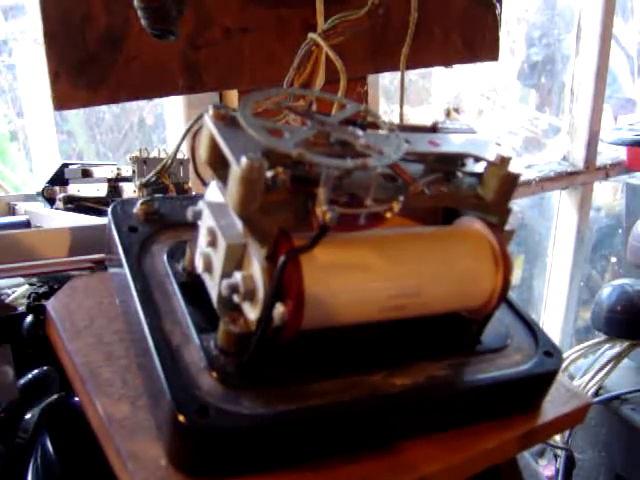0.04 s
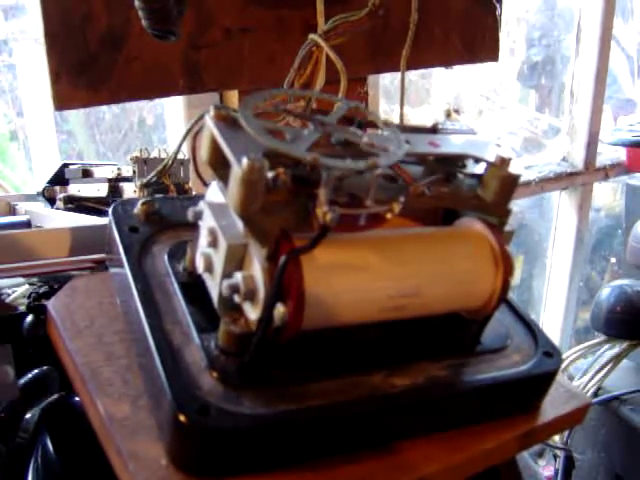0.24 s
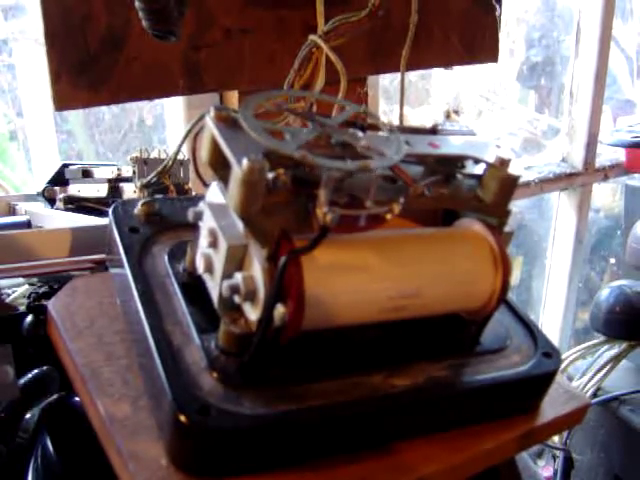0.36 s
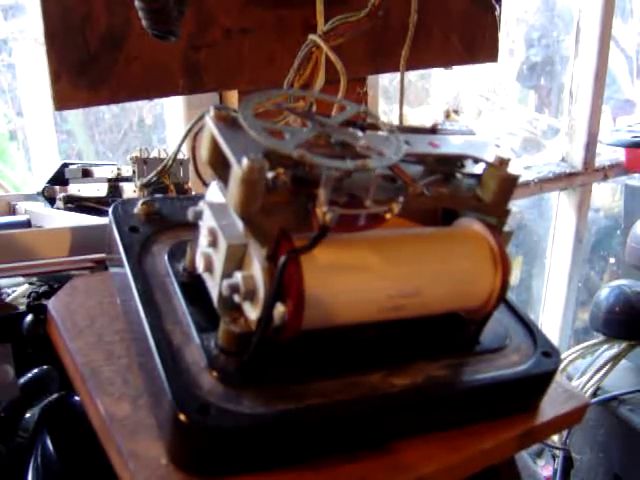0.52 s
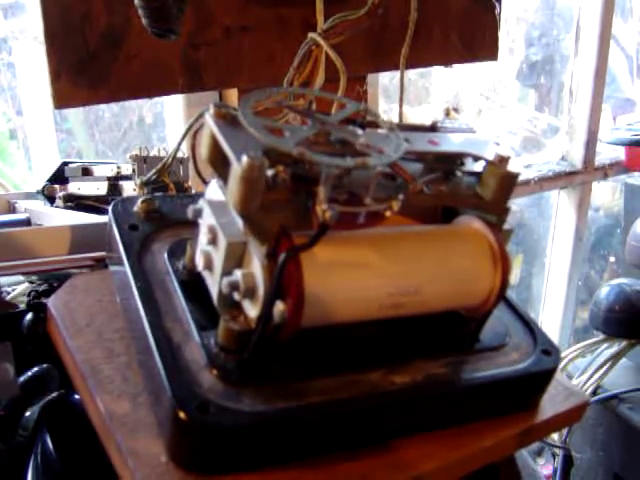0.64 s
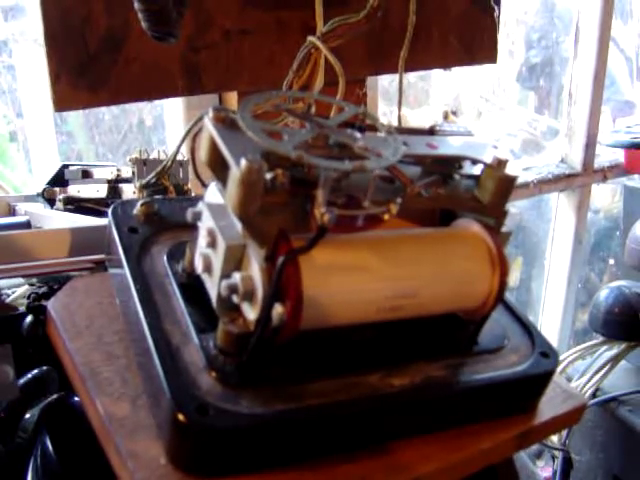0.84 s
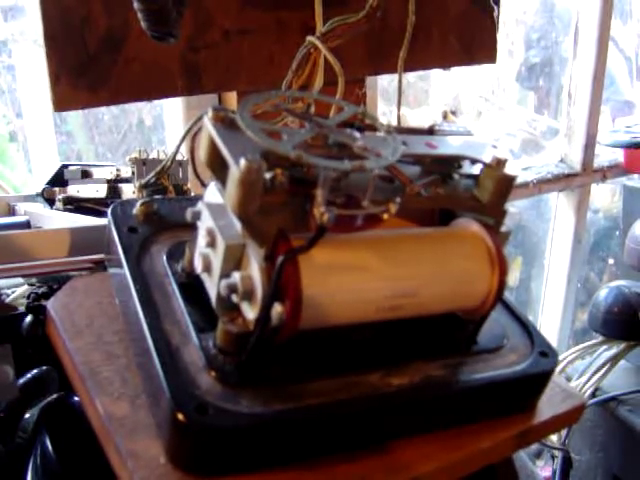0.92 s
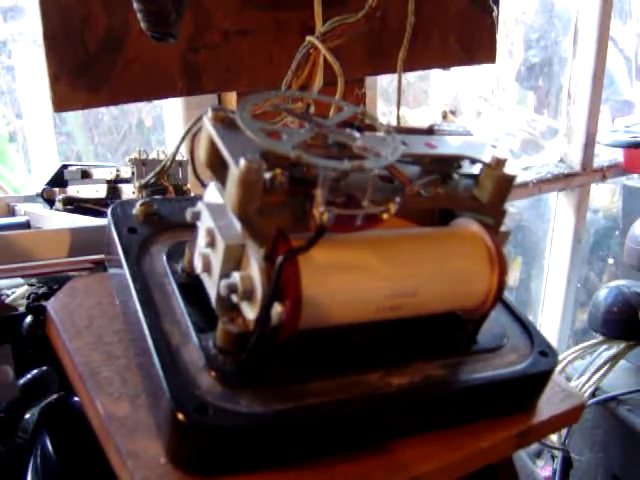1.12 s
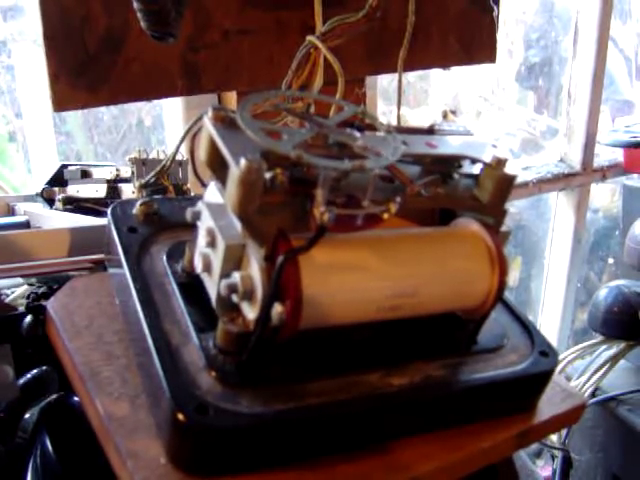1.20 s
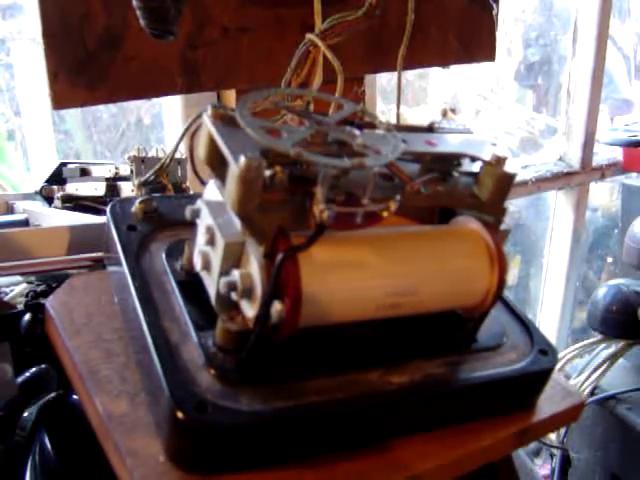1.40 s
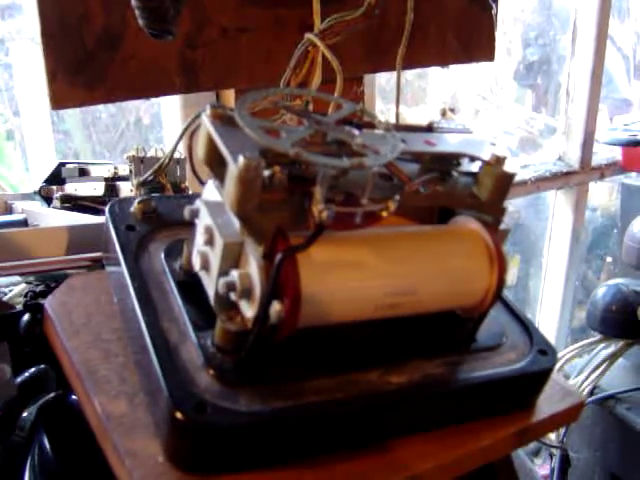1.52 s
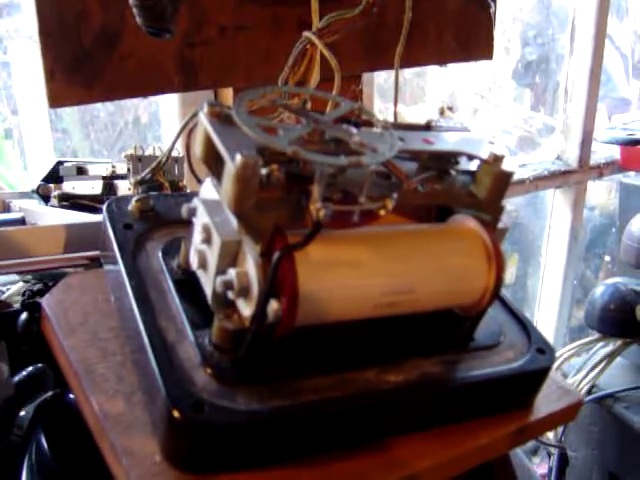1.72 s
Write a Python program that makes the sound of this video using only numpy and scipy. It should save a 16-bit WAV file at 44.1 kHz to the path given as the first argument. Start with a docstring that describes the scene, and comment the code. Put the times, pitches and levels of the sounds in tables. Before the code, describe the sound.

An old electromechanical mechanism gives two quick groups of sharp metal clacks with ticking contacts and rattling springs. A few faint hollow knocks follow as it settles, close to the microphone in a small quiet room.

```python
"""A small quiet room, microphone close to an old electromagnetic telephone selector on a wooden table.
The armature pulls in and drops back: two groups of metal clacks ring the frame and its small parts,
one clack with a low thump, while contacts tick and loose springs rattle. As the mechanism settles,
soft knocks sound its hollow base and something brushes lightly. Room tone and hiss lie underneath."""
import sys
import numpy as np
from scipy import signal
from scipy.fft import rfft, irfft
from scipy.io import wavfile

SR = 44100
rng = np.random.default_rng(int(sys.argv[2]) if len(sys.argv) > 2 else 0)


def store_wav(level_fs):
    """Save 16-bit WAV to argv[1]."""
    pcm = np.round(np.clip(np.atleast_2d(level_fs), -1, 1) * 32767)
    wavfile.write(sys.argv[1], SR, pcm.T.astype(np.int16))


N = 77175

# steady room tone and hiss (frequency [Hz], level [dB])
FLOOR_SPECTRUM = [(18, -53), (30, -18), (96, -8), (181, -4.5), (210, 0), (274, -1.5), (491, -5.5),
                  (541, -3), (626, -5), (1780, -10.5), (2060, -13), (2500, -12.5), (10000, -15),
                  (13000, -98), (22000, -120)]
# faint wash behind the opening (frequency [Hz], level [dB])
WASH_SPECTRUM = [(60, -15), (200, -0.5), (450, 3), (800, -4), (1500, -4.5), (3100, -5.5), (4500, -15.5),
                 (10000, -32)]
# colour of the room's tail (frequency [Hz], level [dB])
TAIL_SPECTRUM = [(100, 7), (250, 5.5), (450, 4), (800, 6.5), (1100, -3.5), (1600, -1.5), (2200, -8.5),
                 (3500, -9.5), (6000, -9.5), (10000, -8.5)]
# decay of the room's tail (frequency [Hz], t60 [s])
TAIL_DECAY = [(150, .6), (500, 0.61), (1200, .34), (3000, 0.29), (6000, 0.23), (10000, 0.13)]
# light brushing (frequency [Hz], level [dB])
BRUSH_SPECTRUM = [(300, -26), (1500, -7), (3000, -1), (4500, -1), (6000, -4), (10000, -27)]
# soft knocks (time [s], level [dB], rise [s], tilt [dB/octave], most excited frequency [Hz], its lift [dB])
SETTLING_KNOCKS = [(0.5440, -39, 0.0075, -0.5, 925, 1), (0.6030, -46.5, 0.0093, 1.5, 1590, 16),
                   (0.7630, -43, 0.0086, -2, 2790, 2), (0.9010, -47, 0.011, 0, 910, -1.5),
                   (0.9820, -48.5, 0.015, -1.5, 1320, 9)]
# modes of the hollow base (frequency [Hz], level [dB], t60 [s])
BASE_MODES = [(445, -3.5, 0.19), (497.7, -5.5, 0.15), (792, -3.5, 0.12), (868.4, -2, 0.19),
              (944, -0.5, 0.036), (1460, -11, 0.18), (2080, -13.5, .18), (2750, -12.5, 0.18)]
# noisy part of a knock (frequency [Hz], level [dB])
KNOCK_SPECTRUM = [(150, -17), (460, -5.5), (620, -3), (850, -0.5), (1200, -5.5), (1600, -11), (3000, -11.5),
                  (4500, -20), (10000, -34)]
# light ticks of pawl and contacts (time [s], level [dB])
CONTACT_TICKS = [(0.2405, -34.5), (0.2662, -25), (0.384, -20), (0.3898, -27), (0.4035, -35), (0.4087, -36),
                 (0.4408, -39), (0.451, -38.5), (0.4586, -48), (0.485, -55), (1.01, -48)]
# loose springs rattling on after the blows (time [s], level [dB], t60 [s], tilt [dB/octave])
SPRING_RATTLES = [(0.267, -32, 0.2, -2.5), (0.381, -29, 0.087, 0), (0.475, -42.5, 0.24, -2.5)]
# dense ring of the small parts (frequency [Hz], level [dB])
PARTS_SPECTRUM = [(100, -34), (300, -12.5), (520, -8.5), (900, -6), (1100, -4), (1300, -6), (1700, -1.5),
                  (2200, 1), (3500, 1), (5200, -1), (7000, -4.5), (8300, 1.5), (10000, -5.5)]
# modes of frame and armature (frequency [Hz], level [dB], t60 [s])
FRAME_MODES = [(542, -18, 0.13), (775.8, -14, 0.26), (1017.6, 3, 0.11), (1094.6, -1, 0.11), (1142, 0, 0.13),
               (1338.5, -9.5, 0.16), (1695, -6.5, 0.07), (1981, -8, 0.069), (2054, -4, 0.052),
               (2164, -2.5, 0.072), (2607, 1.5, 0.046), (2690, -7.5, 0.074), (2930, -7, 0.033),
               (3325, -5.5, 0.076), (3390, -2.5, 0.053), (3490, -4, 0.064), (3821, 3.5, 0.042),
               (4261, -4, 0.072), (4276, -4, 0.027), (4760, -9, 0.06), (5878, 3, 0.028), (7780, -11, 0.032),
               (8500, -12, 0.067), (8620, -10, 0.08), (9270, -5.5, 0.045)]
# metal blows (time [s], level [dB], rise [s], small parts' t60 at 2500 Hz [s], bass [dB], body [dB],
# clang [dB], treble [dB], most excited frequency [Hz], its lift [dB])
ARMATURE_BLOWS = [(0.2256, -15.5, 0.0082, 0.042, 0.5, -3.5, 0.5, -2, 2510, 7.5),
                  (0.2560, -18, 0.0045, 0.042, 0, -1, -1.5, -5, 2014, 7.5),
                  (0.371, -16, 0.0029, 0.063, -6, -0.5, -3.5, 2.5, 3690, 4),
                  (0.4230, -18.5, 0.0026, 0.051, -3.5, 1, 3.5, -5, 2180, 7.5),
                  (0.4690, -26.5, 0.0023, 0.082, 0.5, -6.5, -4.5, -9.5, 2190, 9.5)]

CONTACT_S = 0.0022  # struck parts grind together this long before they ring freely
EXCITED_WIDTH_HZ, TOP_HZ = 148, 10100
TIME, BIN_HZ = np.arange(N) / SR, np.fft.rfftfreq(N, 1 / SR)


def undb(db):
    """Decibels to gain."""
    return 10 ** (np.asarray(db) / 20)


def unit(x):
    """Scale to rms 1."""
    return x / np.sqrt(np.mean(x ** 2))


def octaves(hz):
    """Distance of each spectral bin from a frequency, in octaves."""
    return np.log2(np.maximum(BIN_HZ, 10) / hz)


def curve(points):
    """A (Hz, dB) table spread over the spectral bins, 2 % lower in pitch."""
    hz, db = np.array(points, float).T
    return np.interp(octaves(0.98), np.log2(hz), db)


def bump(hz, width):
    """A resonance shape over the spectral bins, 1 at its centre."""
    return 1 / (1 + (2 * (BIN_HZ - hz) / width) ** 2)


def colour(x, db):
    """Filter by a dB value per bin."""
    return irfft(rfft(x) * undb(db), N)


def noise(db):
    """Noise of rms 1 with the given spectrum."""
    return unit(colour(rng.standard_normal(N), db))


def onset(start, rise):
    """A smooth step from 0 to 1."""
    return np.sin(np.pi / 2 * np.clip((TIME - start) / rise, 0, 1)) ** 2


def strike(start, rise, t60, hold=0):
    """Envelope of a blow: a short rise, a hold, then exponential decay."""
    return onset(start, rise) * undb(-60 * np.maximum(TIME - start - rise - hold, 0) / t60)


def fade(x, start, rise, t60_at, hold=0):
    """Let each octave of a sound die away at its own rate."""
    out, spectrum = 0, rfft(x)
    octave = np.clip(octaves(160), 0, 6)
    for k in range(7):
        band = irfft(spectrum * np.maximum(1 - abs(octave - k), 0), N)
        out += band * strike(start, rise, t60_at(160 * 2 ** k), hold)
    return out


def ring(modes, start, rise, tone_db, detune=0.0019):
    """Decaying modes of a struck body, weighted by the tone of this blow."""
    out = 0
    for hz, db, t60 in modes:
        weight = undb(db + tone_db[int(hz * N / SR)])
        cycles = hz * (1 + detune * rng.standard_normal()) * (TIME - start) + rng.random()
        out += weight * np.sin(2 * np.pi * cycles) * strike(start, rise, t60, CONTACT_S)
    return out / np.sqrt(sum(undb(db) ** 2 / 2 for _, db, _ in modes))


def background(wash_fall_db_per_s=19, wash_hold_s=0.089):
    """Steady room tone and hiss, with a faint wash that dies away."""
    wash_db = -51.5 - wash_fall_db_per_s * np.maximum(TIME - wash_hold_s, 0)
    return undb(-56.5) * noise(curve(FLOOR_SPECTRUM)) + undb(wash_db) * noise(curve(WASH_SPECTRUM))


def room(x):
    """Diffuse tail of the small room, faint this close to the source and duller as it fades."""
    hz, t60 = np.array(TAIL_DECAY).T
    tail = fade(noise(curve(TAIL_SPECTRUM)), start=0, rise=0.013, t60_at=lambda f: np.interp(f, hz, t60))
    tail /= np.sqrt(np.sum(tail ** 2))
    return undb(-19) * signal.fftconvolve(x, tail)[:N]


def brush():
    """Something brushes lightly after the last knock."""
    return undb(-56.5) * strike(start=1.187, rise=0.014, t60=0.15) * noise(curve(BRUSH_SPECTRUM))


def knocks():
    """Soft contacts of the settling mechanism sound mostly the hollow base."""
    out = 0
    for start, db, rise, tilt, excited_hz, lift in SETTLING_KNOCKS:
        tone = tilt * octaves(830) + lift * bump(excited_hz, EXCITED_WIDTH_HZ)
        rattle = colour(noise(curve(KNOCK_SPECTRUM)), tone) * strike(start, rise, t60=0.28)
        base = ring(BASE_MODES, start, rise, tone)
        out += undb(db) * (undb(-1) * base + undb(-4.5) * rattle)
    return out


def small_parts(lift_db=5, rolloff_db_per_octave=80):
    """Spectrum of the small parts in dB, lifted where the frame resonates, falling away at the top."""
    resonances = np.max([bump(hz, width=98) for hz, _, _ in FRAME_MODES], axis=0)
    rolloff = rolloff_db_per_octave * np.maximum(octaves(TOP_HZ), 0)
    return curve(PARTS_SPECTRUM) + lift_db * resonances - rolloff


def ticks(latch_s=0.3675, latch_db=-28):
    """Pawl and contacts tick, and a latch lets go just before the third blow."""
    events = CONTACT_TICKS + [(latch_s, latch_db)]
    envelope = sum(undb(db) * strike(start, rise=0.0022, t60=0.018) for start, db in events)
    return envelope * noise(small_parts())


def grains(per_s=650, decay_s=0.0022, scatter_db=5.5):
    """Envelope of many tiny uneven contacts, rms 1."""
    hits = rng.random(N) < per_s / SR
    sizes = undb(scatter_db * np.clip(rng.standard_normal(N), -2, 2))
    power = signal.lfilter([1], [1, -np.exp(-2 / (SR * decay_s))], (hits * sizes) ** 2 + 1e-18)
    return unit(np.sqrt(power))


def rattles():
    """Loose springs chatter in a ragged, fading stream of contacts."""
    out, spectrum = 0, small_parts()
    for start, db, t60, tilt in SPRING_RATTLES:
        contacts = grains() * rng.standard_normal(N)
        chatter = unit(colour(contacts, spectrum + tilt * octaves(2000)))
        out += undb(db) * strike(start, rise=0.0022, t60=t60) * chatter
    return out


def thump(start=0.3715, fall_s=0.013, return_s=0.04):
    """One low push of pressure at the microphone with the third blow, and its slow swing back."""
    push = onset(start, rise=0.0043) * np.exp(-np.maximum(TIME - start, 0) / fall_s)
    return undb(-24.5) * signal.lfilter([1, -1], [1, -np.exp(-1 / (SR * return_s))], push)


def clacks(damping_exponent=0.3):
    """Each armature blow rings the frame and a cloud of small parts; the contact point sets its tone."""
    out, spectrum = 0, small_parts()
    for start, db, rise, t60, bass, body, clang, treble, excited_hz, lift in ARMATURE_BLOWS:
        tone = curve([(600, bass), (1050, body), (2100, clang), (3300, 0), (7000, treble)])
        tone += lift * bump(excited_hz, EXCITED_WIDTH_HZ)
        cloud = colour(noise(spectrum), tone)
        parts = fade(cloud, start, rise, lambda hz: t60 * (2500 / hz) ** damping_exponent, CONTACT_S)
        frame = ring(FRAME_MODES, start, rise, tone)
        out += undb(db) * (undb(1.5) * parts + undb(-1) * frame)
    return out


def scene():
    """The selector close up on one microphone, the room behind it."""
    selector = clacks() + rattles() + ticks() + brush() + knocks()
    return (selector + room(selector) + thump() + background())[None, :]


def record(dry):
    """The microphone rounds the loudest peaks and the recorder cuts the top steeply."""
    lowpass = signal.ellip(8, 0.2, 56, TOP_HZ, fs=SR, output="sos")
    return signal.sosfilt(lowpass, np.tanh(dry))


dry = scene()
out = record(dry)
store_wav(out)
```